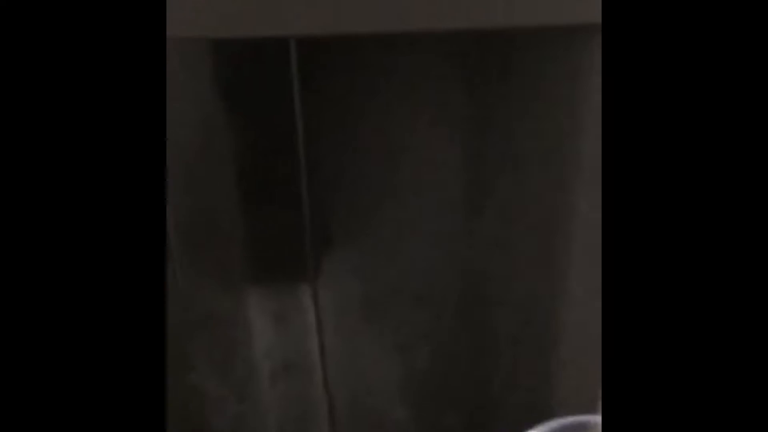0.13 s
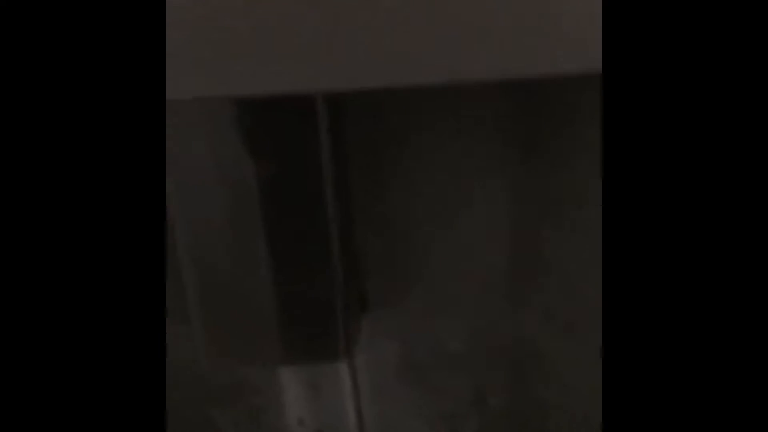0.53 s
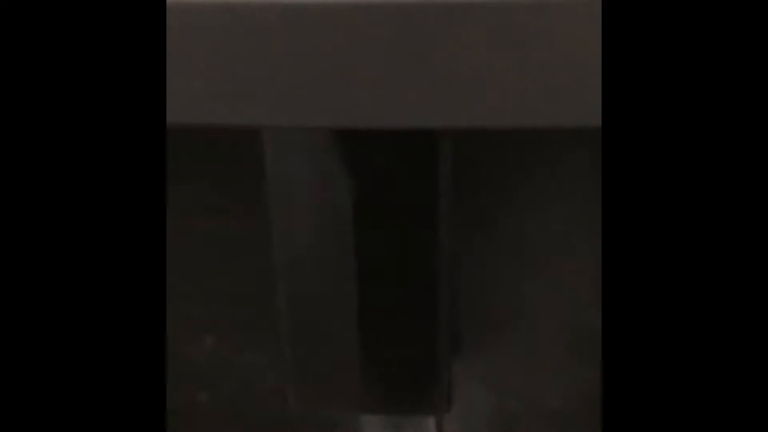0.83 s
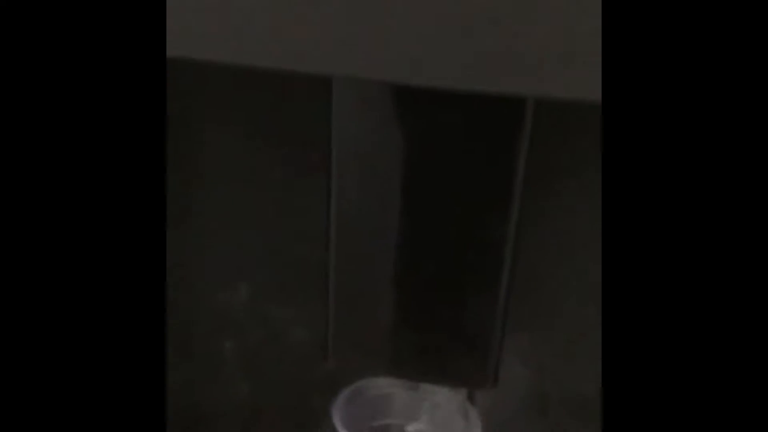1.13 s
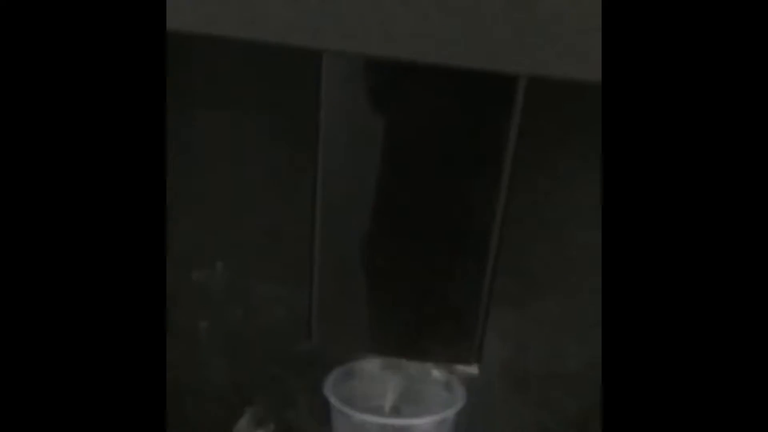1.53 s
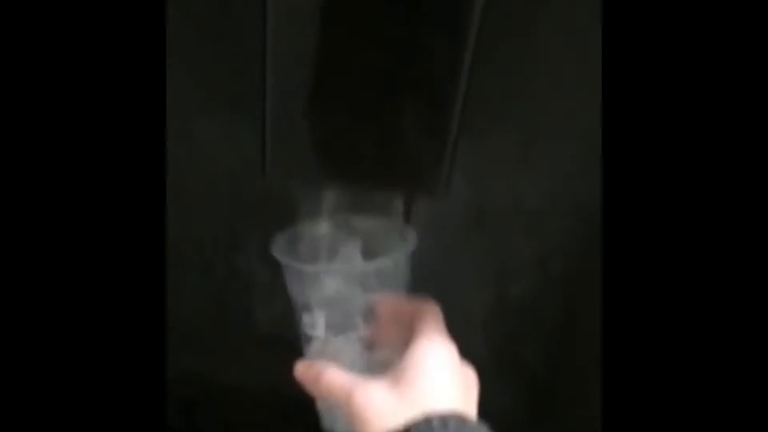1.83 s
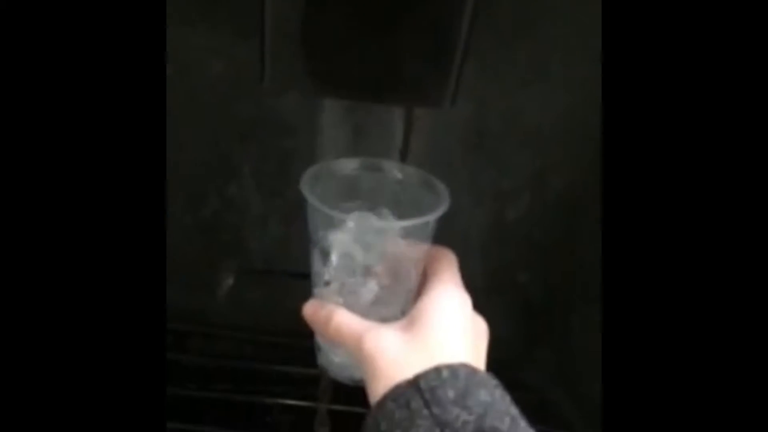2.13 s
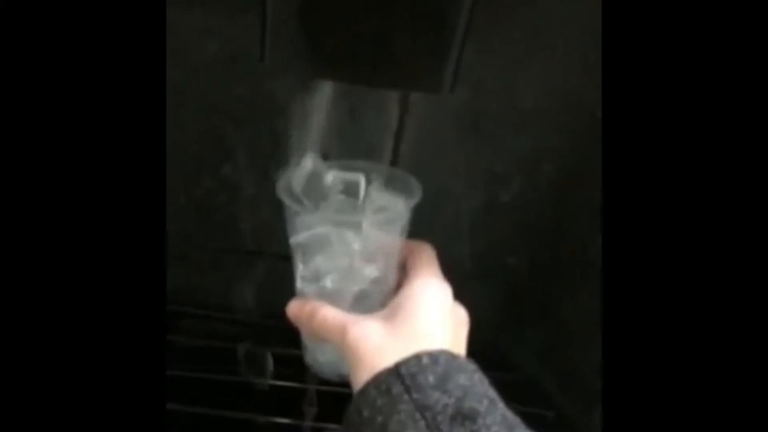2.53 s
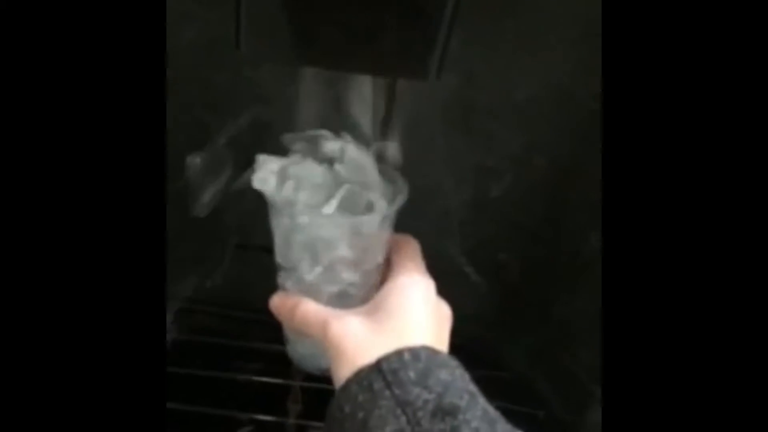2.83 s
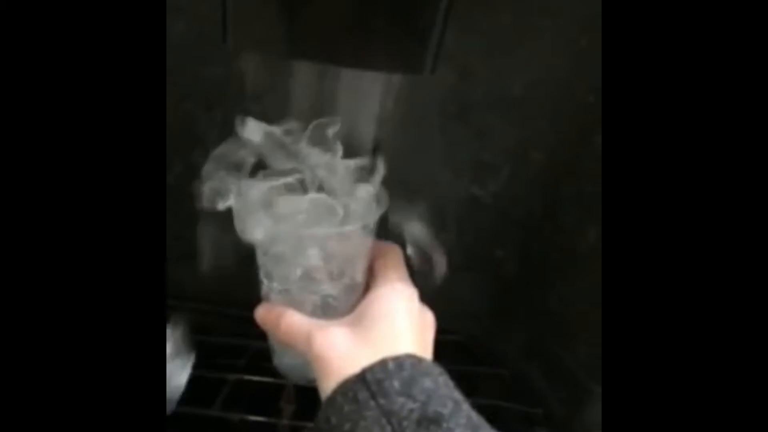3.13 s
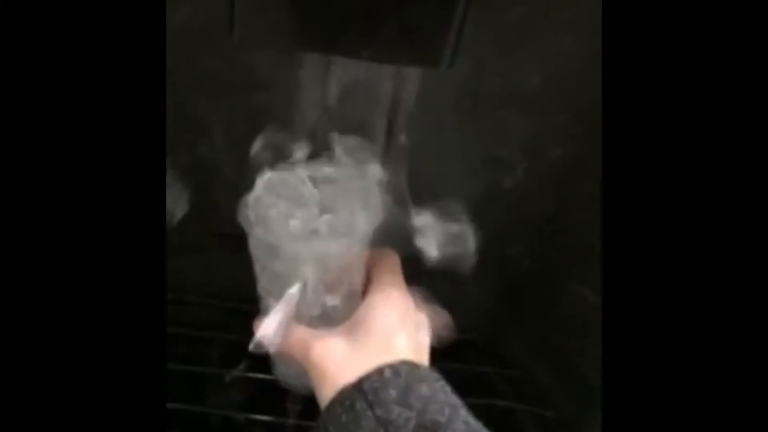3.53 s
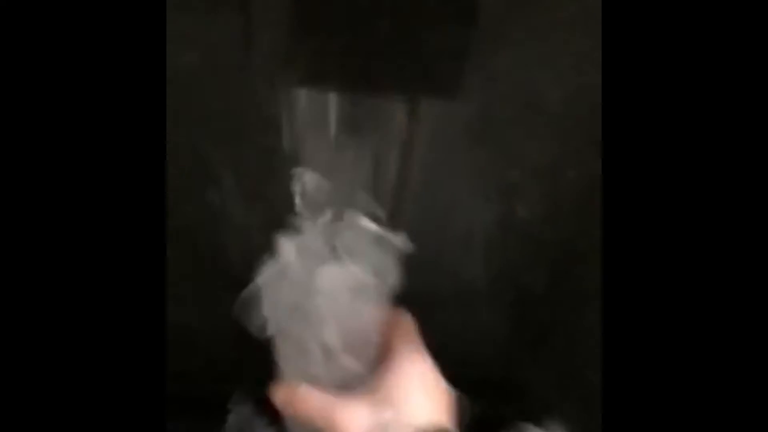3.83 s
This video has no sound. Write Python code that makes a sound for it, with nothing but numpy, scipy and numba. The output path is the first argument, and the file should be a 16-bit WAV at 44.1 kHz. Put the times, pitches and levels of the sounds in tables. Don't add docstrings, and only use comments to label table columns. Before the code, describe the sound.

Ice cubes tumble and crack into a plastic cup after a dispenser motor thumps on

```python
import sys
import numpy as np
from scipy import signal
from scipy.fft import rfft, irfft
from scipy.io import wavfile
from scipy.ndimage import uniform_filter1d
from numba import njit

SR = 44100
rng = np.random.default_rng(int(sys.argv[2]) if len(sys.argv) > 2 else 0)


def invert_db(level):
    return 10 ** (np.asarray(level, dtype=float) / 20)


def generate_wav(signal):
    frames = np.transpose(np.atleast_2d(signal))
    scaled = np.clip(frames, -1, 1) * 32767
    pcm = np.round(scaled).astype(np.int16)
    wavfile.write(sys.argv[1], SR, pcm)


N = 176400

# pitch_hz, level_db (per Hz)
AIR_COLOUR = [(30, -14), (88, -11.5), (125, 1.5), (170, -11.5), (385, -10), (1400, -15), (2700, -24.5),
              (15500, -39.5)]
# time_s, level_db
HUM_LEVEL = [(.12, -37), (.47, -37), (.58, -19.5), (.73, -13.5), (.77, -26.5), (.9, -23), (.96, -28),
             (1.03, -28), (1.12, -29), (1.25, -29.5), (1.92, -33.5), (2.72, -30.5), (3, -30), (4, -31)]
# pitch_hz, level_db
HUM_TONES = [(127.7, -3), (119.9, -2.5), (252.5, -18.5)]
# pitch_hz, level_db
THUMP_TONES = [(127.4, -3), (247.7, -16), (167.8, -14)]
# pitch_hz, level_db (per Hz)
GRIND_COLOUR = [(30, -24), (80, -3), (123, -7.5), (170, -3), (420, -7.5), (1200, -7.5), (3200, -19.5),
                (15500, -58)]
# start_s, crack_db, ring_db, ring_hz
LEVER_KNOCKS = [
    (.408, -33, -21, 1380),
    (.414, -25.5, -13.5, 472),
    (.419, -27, -11.5, 202),
    (.414, -36, -21, 1700),
    (.553, -23, -22, 1300),
    (.561, -19.5, -29, 1530),
    (.568, -43, -33, 1090),
]
# time_s, crack_db, ring_db, ring_hz
ICE_FLOW = [(.56, -30, -25, 1210), (.74, -44, -57, 1220), (.755, -40, -27.5, 1270), (1.14, -57, -23, 1240),
            (1.16, -18, -10, 710), (1.24, -22, -25, 680), (1.27, -21.5, -7.5, 750), (1.56, -14, -14, 800),
            (1.62, -19, -19, 733), (1.95, -20, -15.5, 707), (2.02, -19, -19, 710), (2.34, -45, -25, 746),
            (2.38, -15.5, -10.5, 566), (2.52, -16, -19.5, 585), (2.78, -19, -17, 623),
            (2.82, -12.5, -21, 633), (3.38, -13, -11, 505), (4, -21, -18.5, 598)]
# pitch_hz, level_db (per Hz)
CRACK_COLOUR = [(880, -14), (1500, 0), (1810, -3.5), (2670, -3.5), (5670, -4.5), (12400, -11.5),
                (14600, -14), (15500, -36)]
# pitch_hz, level_db, decay_s (time to fall by 60 dB)
CUP_MODES = [(550, -1.5, 0.056), (696, 4, 0.0065), (896, -7, 0.072), (1300, 2, 0.028), (1841, -2.5, 0.031),
             (2250, -23, 0.014), (400, -3, 0.026), (198, -14.5, 0.037)]
EMPTY_CUP = [-9, 0, 0, -14, -8, 2, -12, -8]
# start_s, level_db
ICE_CRACKS = [(1.1535, -8), (1.1624, -15), (1.2054, -8.5), (1.251, -6.5), (1.275, -11.5), (1.302, -4),
              (1.3157, -6.5), (1.37, -11.5), (1.4478, -8.5), (1.4794, -7.5), (1.5486, -7.5), (1.6986, -6),
              (1.7598, -6.5), (1.847, -7.5), (1.893, -5), (1.9415, -5), (1.9583, -7.5),
              (2.052, -6.5), (2.1046, -12.5), (2.1568, -1), (2.2163, -23), (2.2732, -6), (2.359, -6),
                 (2.424, -8.5), (2.453, -11.5), (2.532, -8.5), (2.5677, -3.5), (2.5964, -9), (2.6478, -4),
                 (2.801, -3.5), (2.8139, -8), (2.831, -23), (2.877, -12), (2.9133, -9), (2.9507, -28),
                 (2.967, -8), (2.9931, -16),
              (3.039, -7.5), (3.0666, -6), (3.1237, -14), (3.2127, -15), (3.267, -12), (3.324, -5.5),
               (3.335, -3.5), (3.3839, -4.5), (3.495, -10.5), (3.5223, -2.5), (3.5805, -7), (3.6175, -4.5),
               (3.6395, -5.5), (3.684, -11), (3.695, -7.5), (3.725, -11.5), (3.7968, -6.5), (3.81, -2.5),
               (3.8636, -2.5), (3.9288, -2), (3.9577, -1),
              (1.091, -20.5), (1.111, -23.5), (1.137, -22), (1.283, -9), (1.402, -11), (1.411, -15),
                 (1.468, -18), (1.485, -12), (1.575, -25), (1.591, -23), (1.71, -23), (1.973, -16),
                 (1.984, -16), (2.372, -19), (2.47, -13), (2.495, -14.5), (2.722, -15.5), (2.885, -6),
                 (3.088, -15), (3.129, -7), (3.145, -7), (3.152, -6), (3.196, -10.5), (3.22, -16.5),
                 (3.281, -9.5), (3.293, -8.5), (3.307, -4.5), (3.348, -15), (3.432, -12.5), (3.45, -21),
                 (3.55, -9), (3.605, -5.5), (3.667, -27), (3.733, -17), (3.753, -26), (3.775, -11.5),
                 (3.823, -7), (3.902, -14), (3.986, -13), (3.995, -4)]
# start_s, level_db, ring_hz
HOLLOW_KNOCKS = [(1.155, -2.5, 723), (1.206, -6.5, 488), (1.252, -2.5, 692), (1.291, -5.5, 840),
                 (1.305, -13, 940), (1.372, -7, 690), (1.414, -5, 767), (1.439, -3.5, 784), (1.451, -6, 810),
                 (1.498, -2, 710), (1.548, 0, 697), (1.762, -3, 681), (1.78, -12, 695), (1.848, -2.5, 628),
                 (1.894, -5, 486), (1.96, -3.5, 846), (2.16, -4.5, 636), (2.273, -3.5, 607),
                 (2.361, -3.5, 590), (2.378, -13, 580), (2.425, -7, 717), (2.455, -6.5, 595),
                 (2.568, -2, 705), (2.812, -2.5, 536), (2.83, -3, 760), (2.891, -4.5, 647), (2.952, -6, 530),
               (2.971, -4, 552), (3.069, -8.5, 700), (3.129, -15, 816), (3.151, -5, 564), (3.213, -12, 570),
               (3.282, -4, 520), (3.294, -6, 658), (3.35, -5, 1300), (3.367, -3, 503), (3.384, -11.5, 465),
               (3.449, -2.5, 428), (3.525, -9.5, 1340), (3.609, -5.5, 284), (3.737, -2, 547),
               (3.751, -11, 545), (3.954, -10, 726),
                 (1.163, -6, 690), (1.222, -10, 515), (1.272, -7, 700), (1.283, -6, 740),
                 (1.313, -6.5, 830), (1.331, -4, 690), (1.352, -13, 614), (1.386, -9, 820),
                 (1.426, -12, 760), (1.48, -17, 700), (1.511, -7.5, 770), (1.726, -9.5, 550),
                 (1.985, -12, 870), (2.176, -10.5, 1170), (2.393, -13, 590), (2.469, -7, 543),
                 (2.484, -1, 550), (2.5, -12.5, 565), (2.645, -18, 870), (2.749, -11, 690),
                 (2.877, -7.5, 816), (2.983, -15.5, 480), (3.03, -13.5, 985), (3.048, -10.5, 644),
                 (3.086, -15, 780), (3.094, -19, 550), (3.269, -16, 610), (3.307, -1, 647),
                 (3.329, -10.5, 343), (3.399, -11, 367), (3.41, -13, 450), (3.431, -7, 1160),
                 (3.463, -10, 614), (3.478, -8, 493), (3.507, -13, 1330), (3.614, -13, 307),
                 (3.641, -10.5, 630), (3.683, -15, 537), (3.725, -15, 880), (3.758, -2, 560),
                 (3.773, -11, 550), (3.792, -12, 540), (3.811, -15, 694), (3.837, -11, 1540),
                 (3.87, -16.5, 585), (3.971, -3.5, 370)]

MOTOR_START_S = .528
FILLING_S, FULL_S = 1.6, 3.1


def level(x, db):
    return x * invert_db(db) / np.sqrt(np.mean(x ** 2))


def curve(table, col):
    table = np.array(table, float)
    return np.interp(np.arange(N) / SR, table[:, 0], table[:, col])


def colour(x, points):
    points = np.array(points, float)
    hz = np.maximum(np.fft.rfftfreq(len(x), 1 / SR), 1)
    gain_db = np.interp(np.log(hz), np.log(points[:, 0]), points[:, 1])
    return irfft(rfft(x) * invert_db(gain_db), len(x))


def walk(rate):
    hold = int(SR / rate)
    steps = np.repeat(rng.standard_normal(N // hold + 1), hold)
    return np.sqrt(2) * uniform_filter1d(uniform_filter1d(steps, hold), hold)[:N]


def room_air():
    return level(colour(rng.standard_normal(N), AIR_COLOUR), -38.5) * invert_db(0.5 * walk(15.6))


def compressor_hum():
    t = np.arange(N) / SR
    hum = np.zeros(N)
    for hz, db in HUM_TONES:
        wobble_db = 4 * walk(22)
        hum += invert_db(db + wobble_db) * np.sin(2 * np.pi * hz * t + .7 * walk(16))
    return hum * invert_db(curve(HUM_LEVEL, 1))


def motor_thump():
    rise_s, hold_s, fall_s = 0.0176, 0.029, 0.0019
    age = np.arange(N) / SR - MOTOR_START_S
    swell = np.clip(age / rise_s, 0, 1) * np.exp(-np.maximum(age - rise_s - hold_s, 0) / fall_s)
    tones = sum(invert_db(db) * np.sin(2 * np.pi * hz * age) for hz, db in THUMP_TONES)
    return invert_db(-2) * swell * tones


def auger_grind():
    rise_s = 0.097
    noise = level(colour(rng.standard_normal(N), GRIND_COLOUR), -30) * invert_db(2.2 * walk(25))
    return noise * np.clip((np.arange(N) / SR - MOTOR_START_S) / rise_s, 0, 1)


def ice_slide():
    start_s, band_hz, grow_db_per_s = .745, (1100, 5000), 4
    t = np.arange(N) / SR
    hiss = signal.lfilter(*signal.butter(1, band_hz, "band", fs=SR), rng.standard_normal(N))
    hiss = level(hiss * invert_db(4.8 * walk(60)), -33.5)
    return hiss * (t > start_s) * invert_db(grow_db_per_s * np.clip(t - start_s, 0, .5))


def alcove(x):
    decay_s, rise_s, top_hz = .24, 0.011, 12500
    t = np.arange(SR // 2) / SR
    dull = signal.lfilter(*signal.butter(1, top_hz, fs=SR), rng.standard_normal(len(t)))
    echo = dull * invert_db(-60 * t / decay_s) * np.clip(t / rise_s, 0, 1)
    echo = echo / np.sqrt(np.sum(echo ** 2))
    return x + invert_db(-9.5) * signal.fftconvolve(x, echo)[:N]


def rattles():
    count, pour_s = 650, .56
    spread_oct, spread_full_oct = 0.37, 1.85
    luck = rng.random((count, 3))
    place = np.minimum(np.arange(count) + 4 * luck[:, 0], count - 1) / count
    at = pour_s + (N / SR - pour_s) * place
    k = (at * SR).astype(int)
    size_db = -5 - 2.13 * np.log(luck[:, 1] + 0.058)
    filled = np.clip((at - FILLING_S) / (FULL_S - FILLING_S), 0, 1)
    spread = spread_oct + (spread_full_oct - spread_oct) * filled
    hz = curve(ICE_FLOW, 3)[k] * 2 ** (spread * (luck[:, 2] - .4))
    return np.array([at, curve(ICE_FLOW, 1)[k] + size_db, curve(ICE_FLOW, 2)[k] + size_db, hz]).T


@njit
def rings(at, hz, t60, size, rise, n, sr):
    out = np.zeros(n)
    for k in range(len(at)):
        z = size[k] + 0j
        turn = np.exp(2j * np.pi * hz[k] / sr - np.log(1000.) / (t60[k] * sr))
        soft = 1.
        for i in range(int(at[k] * sr), min(n, int((at[k] + t60[k]) * sr))):
            out[i] += z.imag * (1 - soft)
            z *= turn
            soft *= rise
    return out


def ring_all(at, hz, t60, size, rise):
    grids = np.broadcast_arrays(at, hz, t60, size)
    at, hz, t60, size = [np.ascontiguousarray(grid, float).ravel() for grid in grids]
    return rings(at, hz, t60, size, rise, N, 1. * SR)


def crack_noise(at, crack):
    crack_s = .0017
    ticks = np.zeros(N)
    np.add.at(ticks, (at * SR).astype(int), crack)
    age = np.arange(2048) / SR
    tail = np.e * age / crack_s * np.exp(-age / crack_s)
    patchy = [(hz, 2.5 * rng.standard_normal()) for hz in np.geomspace(1500, 16000, num=7)]
    noise = colour(colour(rng.standard_normal(N), CRACK_COLOUR), patchy)
    return level(noise, 0) * signal.fftconvolve(ticks, tail)[:N]


def ice_rings(at, crack, contact_s):
    delay, pitch, decay, loss = rng.random((4, len(at), 5))
    return ring_all(at[:, None] + 3.7 * contact_s * delay, 2600 * 3.2 ** pitch ** 1.204,
                    .012 * (0.13 + decay), crack[:, None] * invert_db(-12 * loss), 0.)


def hollow_rings(at, ring, ring_hz, rise):
    decay_s, luck = .022, rng.random(len(at))
    main = ring_all(at, ring_hz, decay_s * (0.53 + luck), ring, rise)
    above_hz = np.minimum(2.65 * ring_hz, 2600.)
    return main + ring_all(at, above_hz, decay_s * (0.33 + luck), ring * invert_db(-12.5), rise)


def cup_rings(at, ring, contact_s, rise):
    cup = np.array(CUP_MODES)
    delay, detune, loss = rng.random((3, len(at), len(cup)))
    empty_db = np.clip((FULL_S - at[:, None]) / (FULL_S - FILLING_S), 0, 1) * EMPTY_CUP
    struck = (ring * (at > MOTOR_START_S))[:, None]
    return ring_all(at[:, None] + contact_s * delay, cup[:, 0] * (1 + 0.098 * (detune - .5)),
                    cup[:, 2], struck * invert_db(cup[:, 1] + empty_db - 24.7 * loss), rise)


def knocks(at, crack_db, ring_db, ring_hz):
    contact_s, ring_rise_s = .002, 0.0005
    at, crack, ring = np.clip(at, 0, 3.999), invert_db(crack_db), invert_db(ring_db)
    rise = np.exp(-1 / (ring_rise_s * SR))
    knock = invert_db(-5.0) * crack_noise(at, crack)
    knock = knock + invert_db(-4.5) * ice_rings(at, crack, contact_s)
    knock = knock + invert_db(3.0) * hollow_rings(at, ring, ring_hz, rise)
    return knock + invert_db(2.0) * cup_rings(at, ring, contact_s, rise)


def falling_ice():
    crack_ring_db, knock_crack_db, low_cut_hz = -9.5, -13, 113
    all_cracks = ICE_CRACKS
    all_knocks = HOLLOW_KNOCKS
    cracks = [(s, db, db + crack_ring_db, 700.) for s, db in all_cracks]
    hollow = [(s, db + knock_crack_db, db, hz) for s, db, hz in all_knocks]
    hits = np.vstack([LEVER_KNOCKS, cracks, hollow, rattles()]).astype(float)
    ice = sum(alcove(knocks(*hits[spot::8].T)) for spot in range(8))
    return signal.sosfilt(signal.butter(2, low_cut_hz, "high", fs=SR, output="sos"), ice)


def scene():
    machine = room_air() + compressor_hum() + motor_thump() + auger_grind() + ice_slide()
    return (machine + falling_ice())[None]


def top_cut(x):
    return signal.sosfilt(signal.butter(12, 16420, fs=SR, output="sos"), x)


def record(dry):
    start_s, fade_s, top_hz = 0.12, 0.034, 15600
    fade = np.clip((np.arange(N) / SR - start_s) / fade_s, 0, 1)
    rounded = np.tanh(1.1 * dry * fade) / 0.99
    mix = signal.sosfilt(signal.ellip(8, .2, 40, top_hz, fs=SR, output="sos"), rounded)
    return top_cut(mix)


dry = scene()
out = record(dry)
generate_wav(out)
```